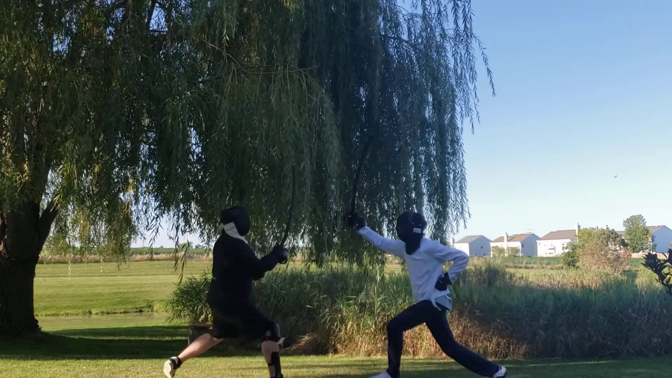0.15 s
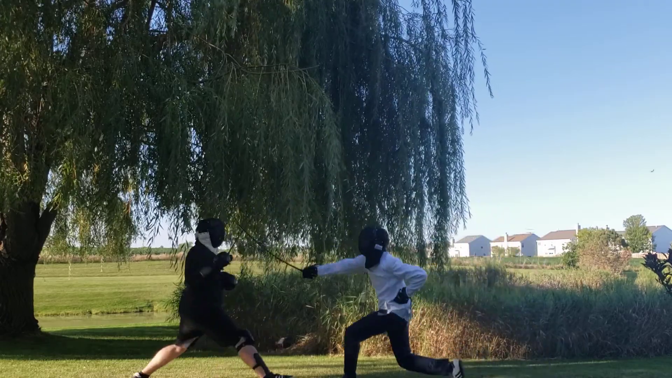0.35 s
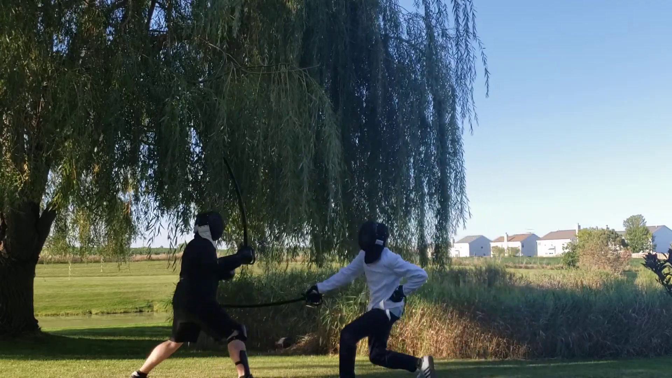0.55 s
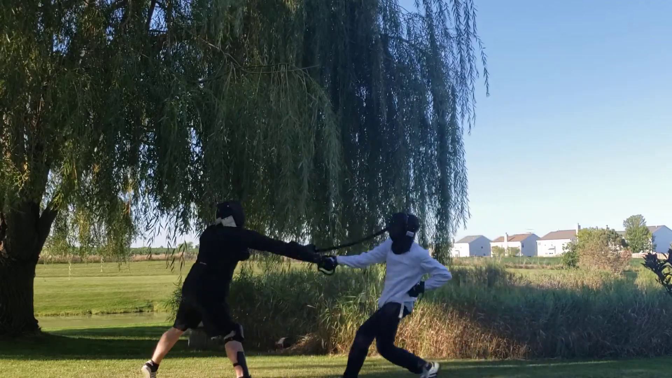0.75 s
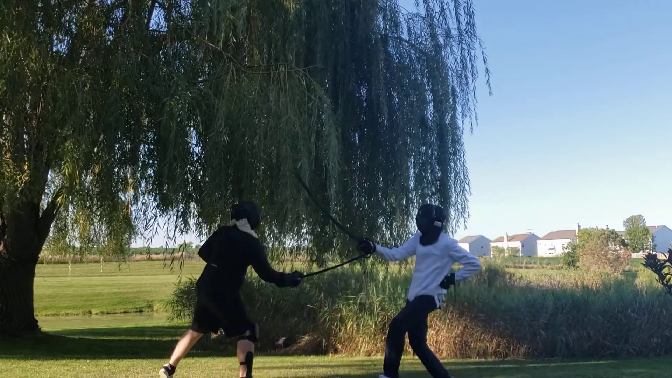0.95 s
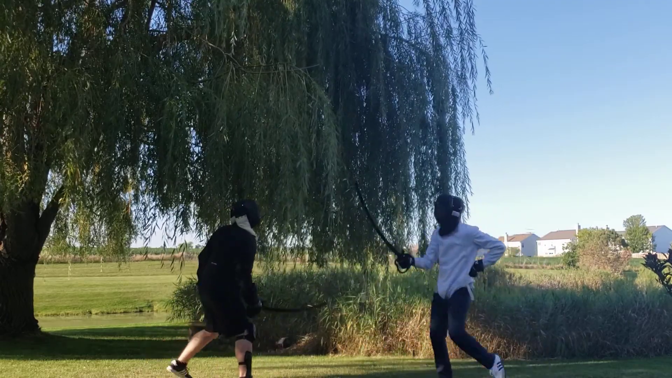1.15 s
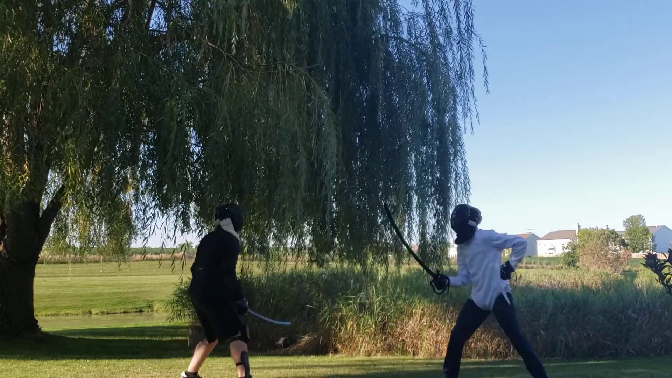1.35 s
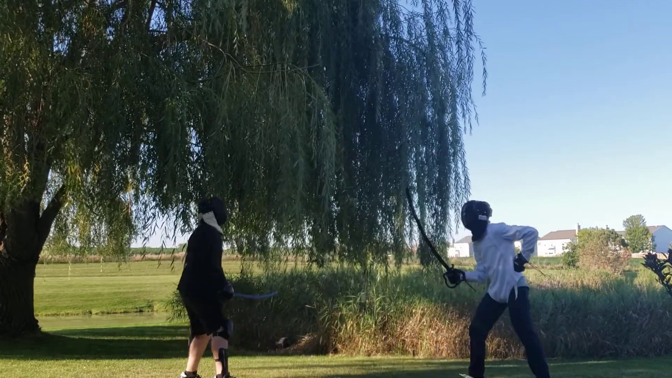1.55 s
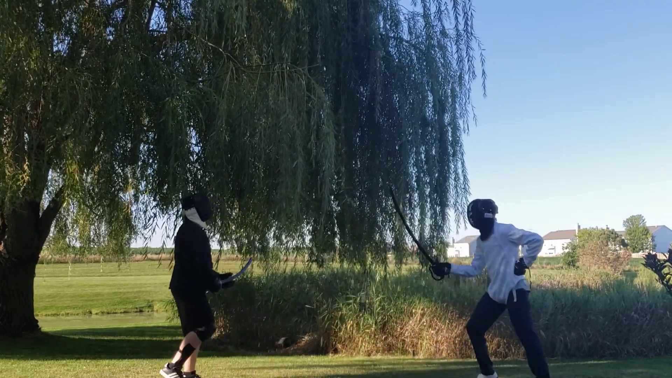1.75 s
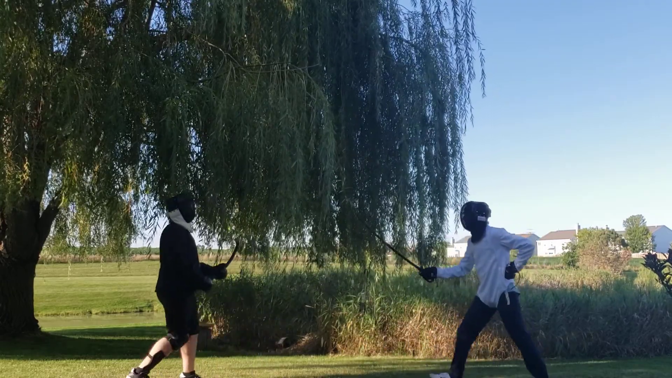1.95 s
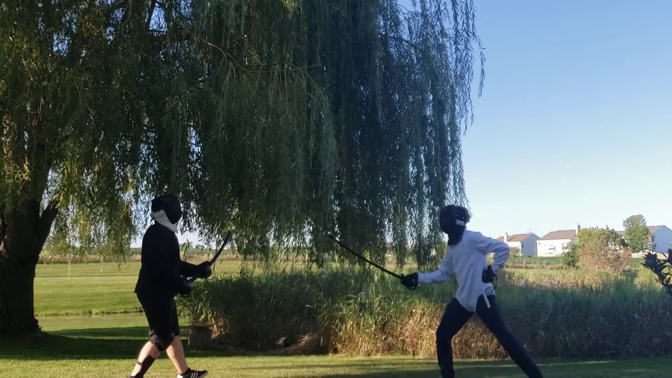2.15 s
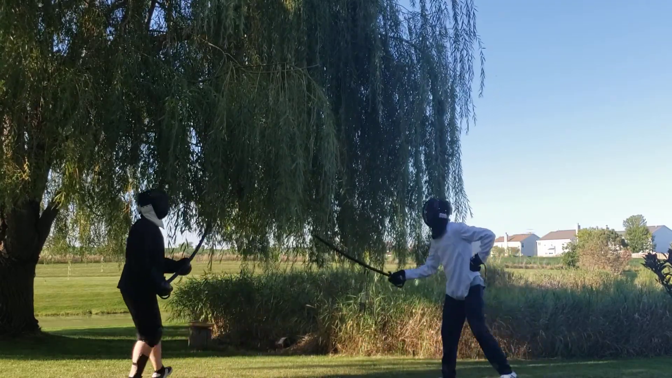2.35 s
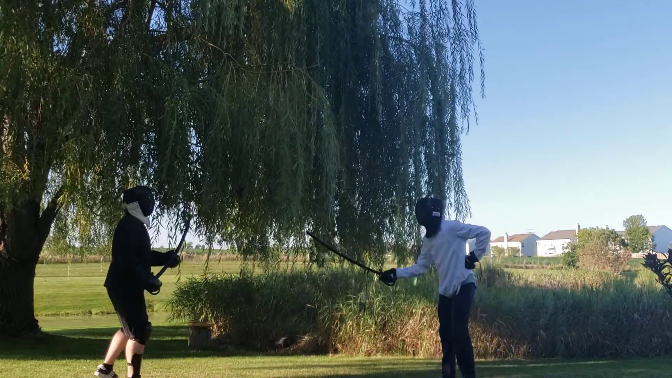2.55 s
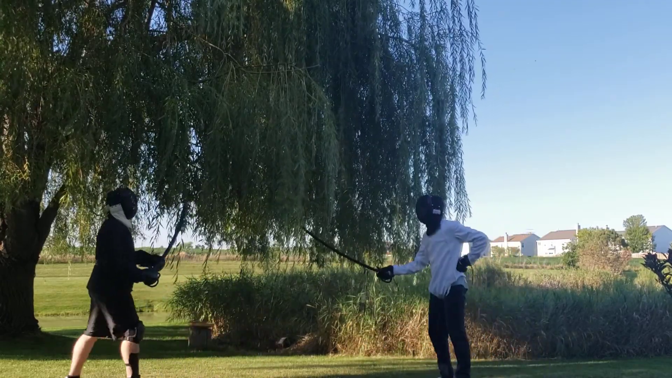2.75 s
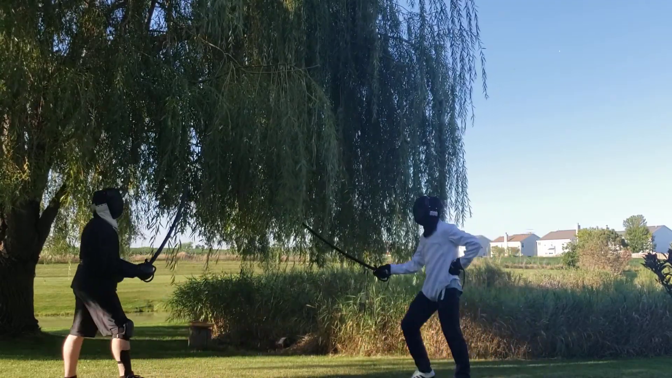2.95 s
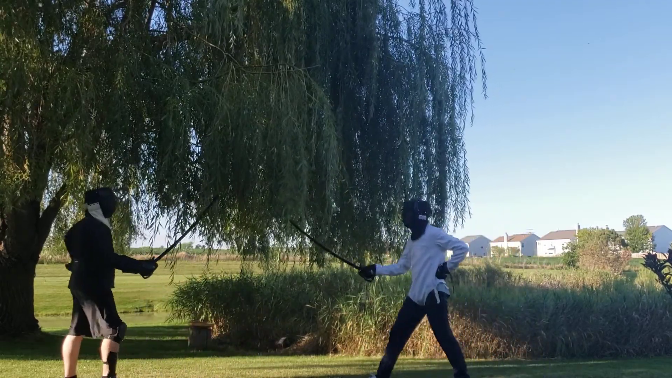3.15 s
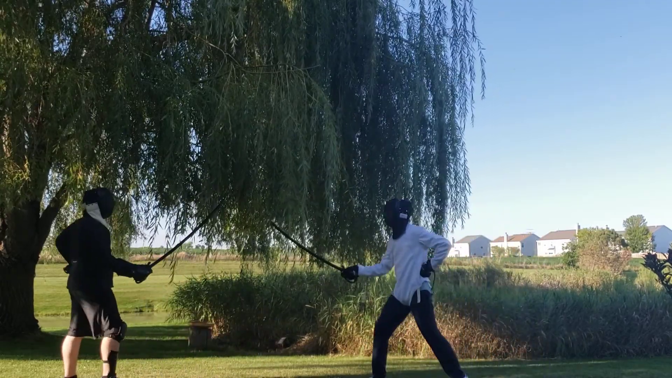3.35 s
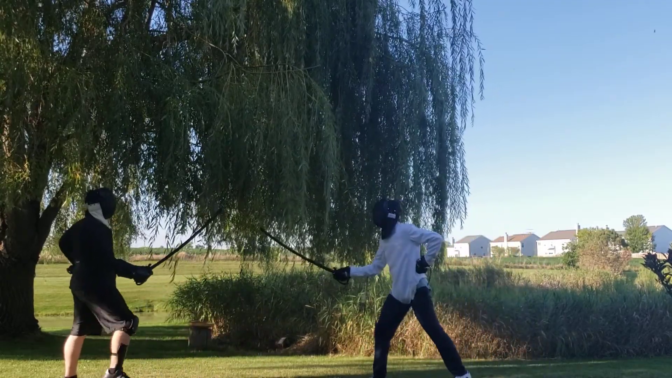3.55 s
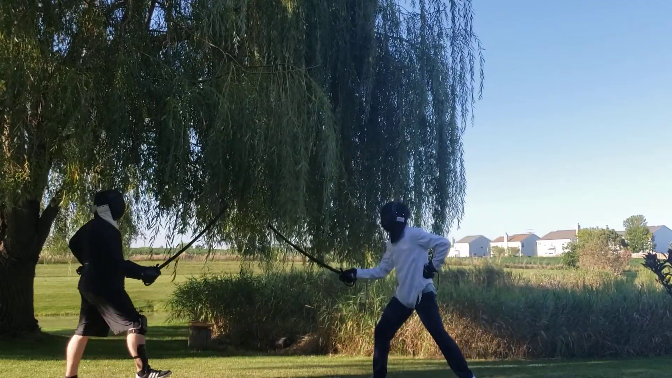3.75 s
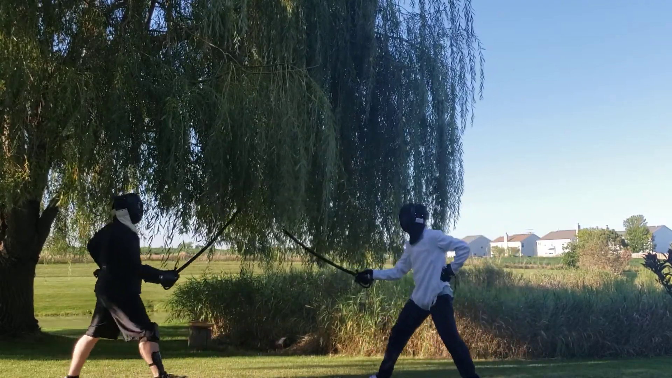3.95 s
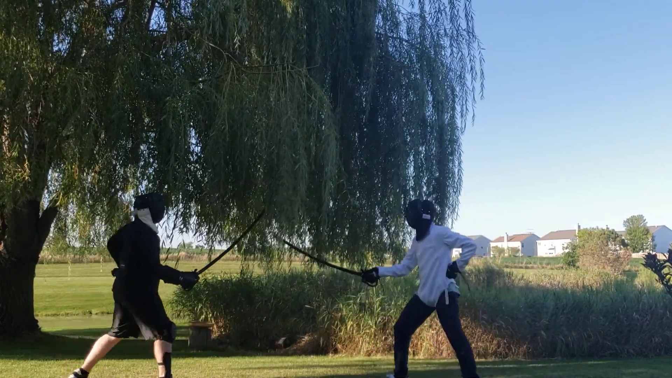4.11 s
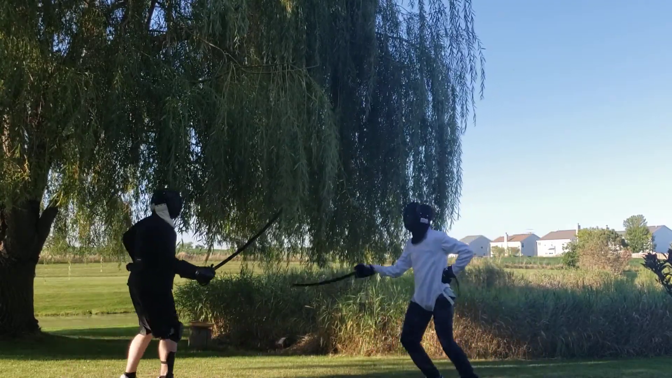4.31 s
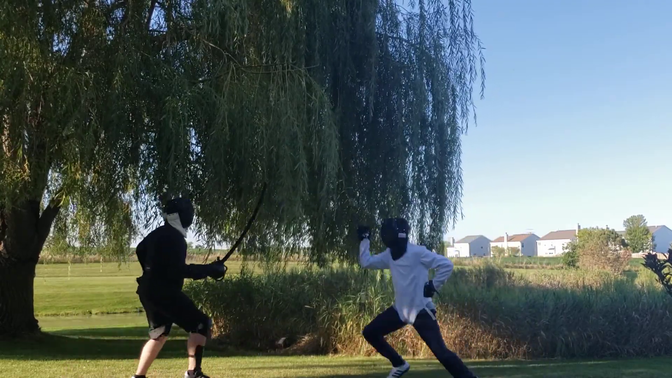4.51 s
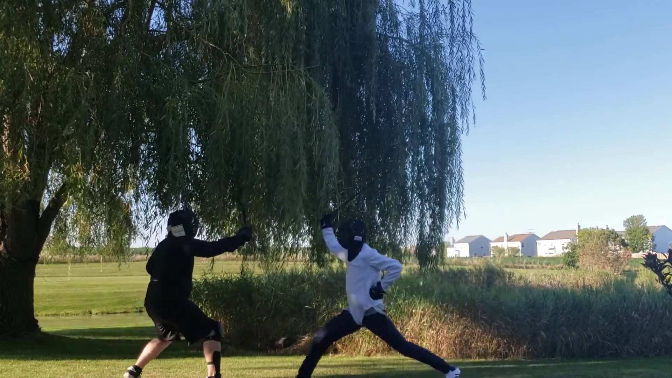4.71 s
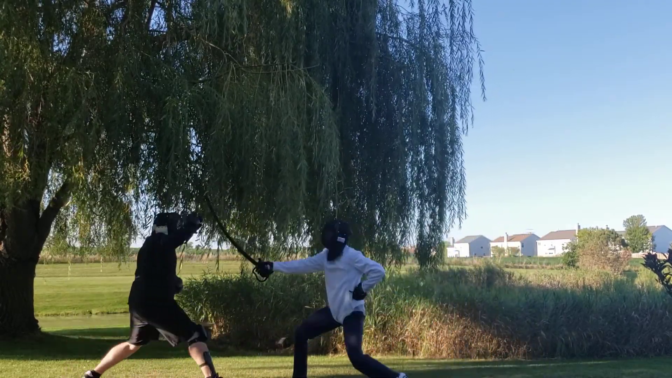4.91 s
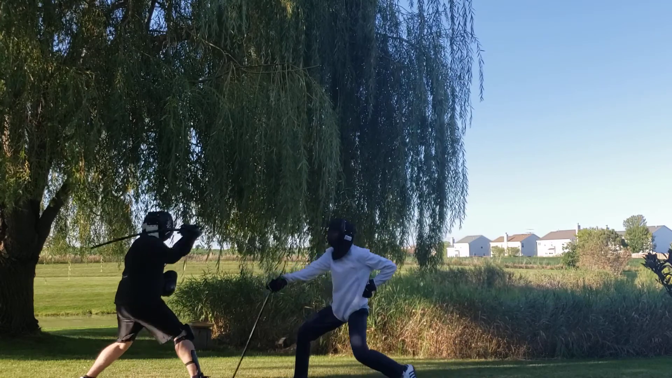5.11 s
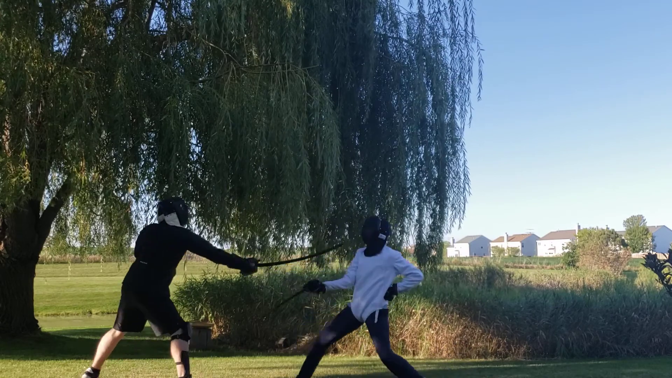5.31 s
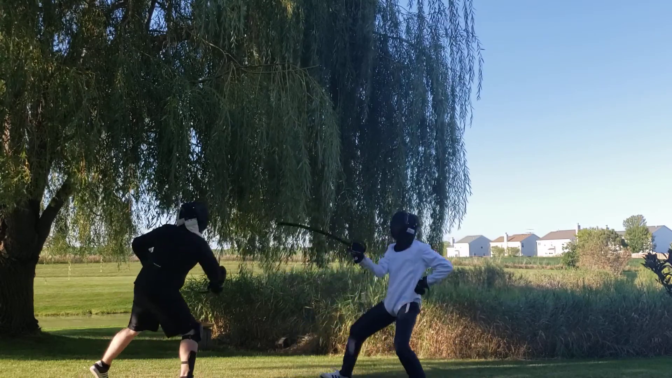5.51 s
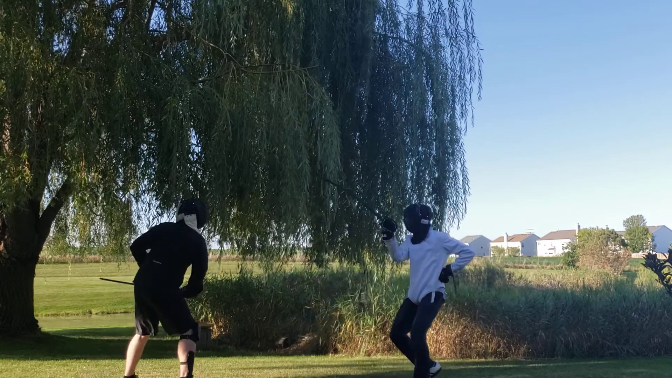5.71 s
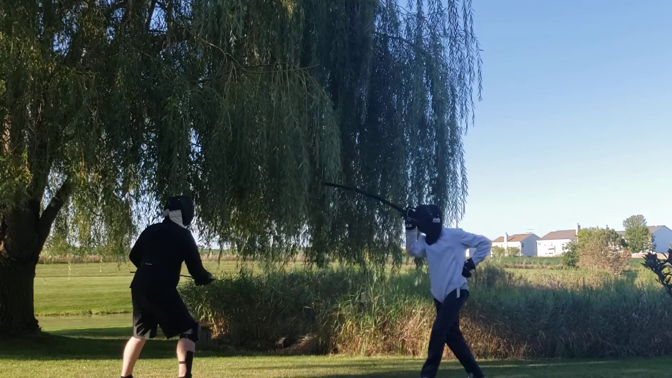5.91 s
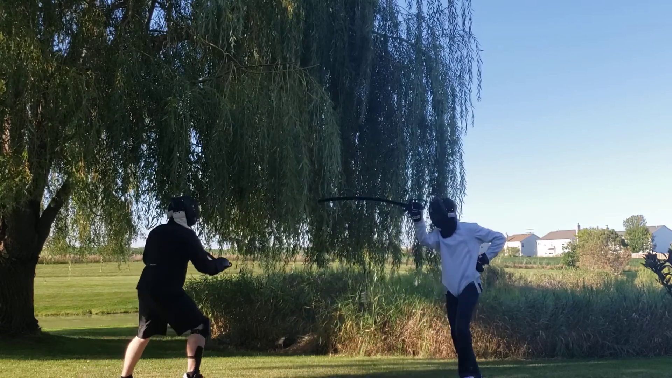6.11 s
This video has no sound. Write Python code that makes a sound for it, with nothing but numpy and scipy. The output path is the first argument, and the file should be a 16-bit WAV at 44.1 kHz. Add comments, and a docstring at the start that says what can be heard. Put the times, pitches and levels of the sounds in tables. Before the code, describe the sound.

Blunt steel sabres clash in sharp, dry clacks with slapping outdoor echoes, a long lull of wind, distant traffic and insects, then another flurry.

```python
"""Blunt sabres clack and chatter as two fencers spar on a lawn beside a willow, metres from a phone.
Each blow is a click that rings damped blade modes; a wall, trees and houses echo it, the willow scatters it.
Grainy ticks follow. Feet stamp as falling tones and brush the grass as noise; blades and sleeves swish.
Wind bumps the right microphone port with low puffs and flutter. Behind: a traffic drone of shaped noise,
rustling air, an insect chorus with buzzes and a pulsed trill, and a few faint gliding bird chirps."""
import sys
import numpy as np
from scipy import signal
from scipy.fft import rfft, irfft, next_fast_len
from scipy.io import wavfile
from scipy.ndimage import uniform_filter1d

SR = 44100
rng = np.random.default_rng(int(sys.argv[2]) if len(sys.argv) > 2 else 0)


def put_to_file(sound):
    """Save the sound as 16-bit audio at rate SR, in the file named by the first command-line argument."""
    columns = np.atleast_2d(sound).T  # one column per channel
    safe = np.clip(columns, -1, 1)
    whole_steps = np.round(safe * 32767)
    wavfile.write(sys.argv[1], SR, whole_steps.astype(np.int16))


def elevation(decibels):
    """Turn decibel levels (scalar or array-like) into linear amplitude ratios."""
    levels = np.asarray(decibels, float)
    return 10 ** (levels / 20)


N = 276371
T = np.arange(N) / SR
PORT_MS = 0.38  # lag of the right port for sound from the far left


def curve(table, column):
    """One column of a table, joined by straight lines in time."""
    return np.interp(T, [row[0] for row in table], [row[column] for row in table])


def colour(x, points, late_ms=0.):
    """Shape a sound by (frequency [Hz], gain [dB]) points and delay it."""
    size = next_fast_len(x.shape[-1] + 4096)
    hz = np.arange(size // 2 + 1) * SR / size + 1e-3
    gain = elevation(np.interp(np.log(hz), np.log([p[0] for p in points]), [p[1] for p in points]))
    delay = np.exp(-2j * np.pi * hz * late_ms / 1000)
    return irfft(rfft(x, size) * gain * delay, size)[..., :x.shape[-1]]


def band(x, hz, width_hz):
    """A resonance with gain 1 at its centre."""
    return signal.lfilter(*signal.iirpeak(hz, hz / width_hz, SR), x)


def band_twice(x, hz, width_hz):
    """Two equal resonances in series: steeper skirts."""
    return band(band(x, hz, width_hz), hz, width_hz)


def noise(points):
    """Coloured noise of rms 1."""
    x = colour(rng.standard_normal(N), points)
    return x / x.std()


def walk(rate_hz):
    """Random levels held 1 / rate_hz and slewed twice; spread near 1."""
    hold = int(SR / rate_hz)
    steps = np.repeat(rng.standard_normal(N // hold + 1), hold)
    return 1.3 * uniform_filter1d(uniform_filter1d(steps, hold), hold)[:N]


def hump(middle_s, length_s):
    """A smooth swell, near 0.1 at both ends of its length."""
    return np.exp(-((T - middle_s) / length_s * 3) ** 2)


def decay(t, t60_s):
    """Exponential fade by 60 dB in t60_s."""
    return np.exp(-np.log(1000) * t / t60_s)


def add(track, s, sound):
    """Mix a short sound in at a time."""
    i = int(s * SR)
    track[i:i + len(sound)] += sound[:N - i]


# left port faces the fencers: (frequency [Hz], left minus right [dB])
PORT_TILT = [(300, -0.5), (1000, 5.5), (3000, 8), (6000, 9), (10000, 3.5), (16000, 15)]


def ports(x, late_ms):
    """A source on both ports: mostly brighter on the left, right delayed by late_ms."""
    left = colour(x, [(hz, db / 2) for hz, db in PORT_TILT])
    right = colour(x, [(hz, -db / 2) for hz, db in PORT_TILT], late_ms)
    return np.array([left, right])


# steel on steel: (frequency [Hz], level [dB])
CRACK_COLOUR = [(300, -15.5), (600, -1.5), (900, 2), (2300, 3), (4000, 0.5), (5800, -5.5), (8000, -3.5),
                (9800, -11.5), (14500, -8.5), (20000, -27.5)]
# thudding guard fades out over: (from [Hz], to [Hz])
GUARD_FADE_HZ = (765, 1910)
# biting edge: (starts [Hz], full from [Hz], full to [Hz], ends [Hz])
EDGE_FADE_HZ = (3370, 5690, 6330, 8740)
# whipping tip fades in over: (from [Hz], to [Hz])
TIP_FADE_HZ = (7800, 9800)


def crack(db, guard_db, edge_db, tip_db):
    """First contact: minimum-phase click with this colour (log gain folded in the cepstrum)."""
    pitch = np.log(np.maximum(np.arange(513) * SR / 1024, 1))
    shape = np.interp(pitch, np.log([p[0] for p in CRACK_COLOUR]), [p[1] for p in CRACK_COLOUR])
    shape += guard_db * np.interp(pitch, np.log(GUARD_FADE_HZ), [1, 0])
    shape += edge_db * np.interp(pitch, np.log(EDGE_FADE_HZ), [0, 1, 1, 0])
    shape += tip_db * np.interp(pitch, np.log(TIP_FADE_HZ), [0, 1])
    cepstrum = irfft(np.log(elevation(db + shape)))
    cepstrum[1:512] *= 2
    cepstrum[513:] = 0
    return irfft(np.exp(rfft(cepstrum)))


# blades and guards damped by gloved hands, nominal: (frequency [Hz], level over the crack [dB], t60 [s])
BLADE_MODES = [(584, 0.6, 0.048), (869, 6, 0.039), (1340, -0.5, 0.021), (1660, -2, 0.0072),
               (2200, -2.5, 0.026), (3062, -4, 0.009), (4060, 3, 0.0069), (4700, -7.5, 0.0045),
               (5800, -0.5, 0.012), (7500, -2.5, 0.042)]
CHATTER_MS = 3.3


def clack(contact, chatter_db):
    """The contact chatters for a few ms and rings damped modes, a little differently each time."""
    t = np.arange(1024) / SR
    push = elevation(chatter_db) * rng.standard_normal(len(t)) * np.exp(-t * 1000 / CHATTER_MS)
    push[int(.0005 * SR)] -= 1
    push /= np.sqrt(np.sum(push ** 2))
    ring = np.zeros(len(t))
    ring[0] = 1
    for (hz, db, t60_s), (detune, share) in zip(BLADE_MODES, rng.standard_normal((len(BLADE_MODES), 2))):
        fade = decay(t, t60_s)
        tone = np.sin(2 * np.pi * hz * (1 + 0.018 * detune) * t)
        ring += elevation(db + 2 * share) * tone * fade * 2 / fade.sum()
    return signal.fftconvolve(signal.fftconvolve(contact, push), ring)


def rough_wall():
    """Ledges and boards split the slap into a short cluster."""
    blur = .08 * rng.standard_normal(256) * np.exp(-np.arange(256) / 60)
    blur[0] = -.9
    return blur


WALL_S = .0517  # usual delay; echoes from beyond the wall shift along with it


def echoes(contacts, delays_s, reflectors):
    """Each rough reflector blurs and colours contacts given as (time s, wall delay shift s, sound)."""
    out, t = np.zeros((2, N)), np.arange(3072) / SR
    for delay_s, (db, hz, width_hz, t60_s, late_ms) in zip(delays_s, reflectors):
        echo = np.zeros(N)
        for s, shift_s, sound in contacts:
            blur = rng.standard_normal(len(t)) * decay(t, t60_s)
            blur[0] += np.sqrt(np.sum(blur ** 2))
            blur /= np.sqrt(np.sum(blur ** 2))
            add(echo, s + delay_s + shift_s * (delay_s > WALL_S), signal.fftconvolve(sound, blur))
        echo = band_twice(echo, hz, width_hz)
        out += elevation(db) * np.array([np.roll(echo, -int(late_ms * SR / 1000)), echo])
    return out


# scatter from turf and trunk over the crown to the reeds: (swells until [s], level [dB], t60 [s])
WILLOW_SWELLS = [(.004, -28.5, 0.087), (0.034, -32, 0.24), (.15, -50.5, .6)]
# (frequency [Hz], level [dB])
WILLOW_TINT = [(300, -2.5), (800, -5), (2000, -4.5), (4300, 1), (6500, -8), (9000, 2), (16000, -1)]
PATCHY_DB, TWIGS_DB = 3.2, 3  # spread per band over 6 ms patches; spread of the quick flicker all bands share


def willow(contacts):
    """Uneven reflectors scatter the blows: patchy noise bands, different leaves for each port."""
    t = np.arange(int(.45 * SR)) / SR
    leaves = 0
    for hz in 400 * 2 ** np.arange(0, 5.6, .5):
        patches = uniform_filter1d(rng.standard_normal((2, len(t))), size=256) * np.sqrt(256)
        grain = band_twice(rng.standard_normal((2, len(t))), hz, hz / 2)
        leaves = leaves + grain * elevation(PATCHY_DB * patches)
    flicker = uniform_filter1d(rng.standard_normal(len(t)), size=64) * 8
    leaves = leaves * elevation(TWIGS_DB * flicker)
    # long paths lose their treble to the air
    dull = colour(leaves, [(800, -0.5), (2500, 6.0), (5000, -4), (9000, -17.5)])
    power = 0
    for peak_s, db, t60_s in WILLOW_SWELLS:
        power = power + elevation(2 * db) * np.where(t < peak_s, (t / peak_s) ** 2, decay(2 * (t - peak_s), t60_s))
    leaves = (dull + (leaves - dull) * np.exp(-t / 0.22)) * np.sqrt(power)
    wash = signal.fftconvolve(colour(contacts, WILLOW_TINT)[None], leaves, axes=1)[:, :N]
    return wash * elevation(np.array([[1.5], [-1.5]]))


# blade contacts: (time [s], level [dB], added by thudding guard [dB], biting edge [dB], whipping tip [dB])
CONTACTS = [(0.3139, 4, -0.5, 13.5, -1.5), (0.3225, -17, -11, 18, 0.5), (0.4581, 3, -10, -5.5, -11.5),
            (0.7727, -2.5, 4, -1, 4), (0.7743, -4.5, 5.5, -4, -0.5), (0.779, -16.5, 10, 5, -1.5),
            (0.784, -13, 13, -4, -1), (0.788, -6.5, 12, 0, -6), (0.793, -8.5, 0, 9, 3.5),
            (1.9534, -52.5, 25, 22, 20), (4.7071, -38.5, 20, 5.5, 12.5), (4.8856, 1.5, -5, 21, 5),
            (4.8967, -4, 6, -7.5, 1.5), (4.9517, -4, -2.5, 2.5, -18.5), (5.4548, -3, 4.5, 4, 8.5),
            (5.459, -22.5, 9, -8, 0.5), (5.476, -27.5, 17, -4.5, 1)]
# how the fencers stand and face in each exchange, sends for clean blows:
# (from [s], wall [dB], willow [dB], trees behind [dB], houses beside [dB])
EXCHANGES = [(0, -31, -0.5, -2, -13), (.4, -5, -8, -0.5, 6), (.7, 0, -4, 6, -20), (4.6, -0.5, -3.5, -4, -3),
             (4.93, -4, -1, 0, -23), (5.3, -22.5, -12, -10.5, -24)]
# wall delay in each exchange: (delay [s])
WALL_DELAYS_S = [.0523, .051, .0543, .0512, .0495, .0528]
# chatter: (clean blows [dB], rebounds [dB])
CHATTER_LEVELS_DB = (-24, -13)
# reflectors: (level [dB], centre [Hz], width of each of two passes [Hz], blur t60 [s], right lag [ms])
TREE_ECHOES = [(-16.5, 2000, 7300, .006, .2), (-16.5, 2400, 3000, 0.063, -.2)]
HOUSE_ECHOES = [(-26.5, 2200, 3000, .012, 0.), (-11.5, 910, 670, .02, 0.)]
# usual delay of each reflector: (delay [s])
TREE_DELAYS_S = (.030, .137)
HOUSE_DELAYS_S = (.110, .1675)
WALL_HZ, WALL_WIDTH_HZ = 4610, 7100  # width of each of two passes
REBOUND_S, BOUNCE_ECHO_DB = .025, -8  # a contact this soon after another is a rebound and echoes less


def sabres():
    """Direct blows, the slap from the wall on the left, other echoes and the willow's wash."""
    direct, to_wall, to_willow = np.zeros((3, N))
    to_trees, to_houses = [], []
    for s, *levels_db in CONTACTS:
        contact = crack(*levels_db)
        rebound = any(0 < s - other[0] < REBOUND_S for other in CONTACTS)
        k = sum(row[0] <= s for row in EXCHANGES) - 1
        wall_s, (_, wall_db, willow_db, trees_db, houses_db) = WALL_DELAYS_S[k], EXCHANGES[k]
        less_db = BOUNCE_ECHO_DB * rebound
        add(direct, s, clack(contact, CHATTER_LEVELS_DB[rebound]))
        slap = signal.fftconvolve(contact, rough_wall())
        add(to_wall, s + wall_s, elevation(wall_db + less_db) * slap)
        add(to_willow, s, elevation(willow_db) * contact)
        to_trees.append((s, wall_s - WALL_S, contact * elevation(trees_db + less_db)))
        to_houses.append((s, wall_s - WALL_S, contact * elevation(houses_db + less_db)))
    out = ports(direct, 0.053) + ports(band_twice(to_wall, WALL_HZ, WALL_WIDTH_HZ), PORT_MS)
    out += echoes(to_trees, TREE_DELAYS_S, TREE_ECHOES) + echoes(to_houses, HOUSE_DELAYS_S, HOUSE_ECHOES)
    return out + willow(to_willow)


# short grainy ticks in the tails of the blows, mostly echoes from trees, wall and houses,
# some perhaps rattles: (time [s], peak before panning [dB], frequency [Hz], t60 [s])
LATE_TICKS = [(0.363, -38, 2300, 0.011), (.385, -35, 1900, .012), (.451, -42, 4100, .015),
              (0.452, -42, 1700, .01), (.478, -42, 2500, .012), (0.598, -46.5, 1487, 0.032),
              (.66, -52, 2280, .015), (0.802, -23, 1250, 0.0083), (.841, -28.5, 2120, 0.017),
              (0.912, -40.5, 2100, 0.16), (.976, -47.5, 1600, 0.044), (4.9145, -18, 4000, .012),
              (4.946, -25, 4000, .01), (5.021, -28, 4160, 0.013), (5.021, -39, 2200, 0.12),
              (5.085, -35, 3900, .025), (5.109, -51, 5200, .012), (5.114, -47.5, 1020, 0.018),
              (5.132, -47, 1120, 0.026), (5.174, -51, 3660, 0.078)]


def late_ticks():
    """Grainy bursts, each through one broad resonance, a little louder on the left."""
    out, t = np.zeros((2, N)), np.arange(6144) / SR
    for s, db, hz, t60_s in LATE_TICKS:
        grains = rng.standard_normal(len(t)) * elevation(4 * np.repeat(rng.standard_normal(96), 64))
        grains[0] = 9  # sharp onset
        burst = band_twice(grains * decay(t, t60_s), hz, 0.45 * hz)
        burst *= elevation(db) / np.abs(burst).max()
        add(out[0], s, elevation(1.5) * burst)
        add(out[1], s, elevation(-2.0) * burst)
    return out


# lunges: (time [s], level [dB], pitch scale [Hz], t60 [s])
LUNGES = [(0.294, -8.5, 234, 0.018), (4.754, -13, 223, 0.027), (4.775, -21.5, 206, 0.039)]


def stamps():
    """Lunges thump the turf: a tone falling from 1.7 to 0.15 times its pitch scale."""
    thumps, t = np.zeros(N), np.arange(4096) / SR
    for s, db, hz, t60_s in LUNGES:
        turns = hz * (0.15 * t + 0.64 * 0.0085 * (1 - np.exp(-t / 0.0035)))
        press = (1 - np.exp(-(t / .0016) ** 2)) * decay(t, t60_s)
        add(thumps, s, elevation(db) * np.cos(2 * np.pi * turns) * press)
    return thumps


# feet brushing the grass: (middle [s], length [s], level [dB])
GRASS_BRUSHES = [(0.463, 0.61, -60), (0.974, 0.51, -61), (1.327, 0.3, -64), (1.633, 0.13, -66),
                 (2.38, .2, -65), (4.26, 0.19, -69), (4.355, 0.23, -65), (4.624, 0.24, -67),
                 (4.775, 0.26, -59.5), (5.559, 0.23, -58.5), (5.922, 0.22, -67.5)]


def grass():
    """Grass hisses under moving feet: treble noise in unsteady swells."""
    tint = [(5000, -19.0), (9500, -19.5), (12500, -10.0), (15200, -8.5), (16500, -9.0)]
    hiss = np.array([noise(tint), noise(tint)])
    return hiss * elevation(1.5 * walk(55)) * sum(elevation(db) * hump(s, length_s) for s, length_s, db in GRASS_BRUSHES)


# blades and sleeves cutting the air: (middle [s], length [s], level [dB], centre [Hz])
AIR_CUTS = [(0.22, 0.3, -65.5, 1650), (4.72, 0.21, -63.5, 1366), (5.432, 0.14, -59, 1900),
            (5.42, 0.12, -66, 2900), (5.935, 0.2, -70.5, 1470)]


def swishes():
    """Broad rushes of air around a centre pitch."""
    out = np.zeros((2, N))
    for s, length_s, db, hz in AIR_CUTS:
        tint = [(hz / 3, -24), (hz * 0.64, -8), (hz, 0), (hz * 1.3, -9), (hz * 2.2, -26)]
        rush = colour(rng.standard_normal((2, N)), tint)
        out += elevation(db) * hump(s, length_s) * elevation(2.5 * walk(90)) * rush / rush.std()
    return out


# (strongest at [s], level [dB], build-up [dB/s], die-away [dB/s])
WIND_GUSTS = [(0., -37, 30, 9.5), (3.902, -42, 22, 45)]
# low puffs, centred 23 ms after their start: (start [s], level [dB])
WIND_PUFFS = [(0.026, -20), (0.104, -19.5), (0.252, -30), (0.737, -27), (0.99, -25), (1.106, -27.5),
              (1.252, -29.5), (3.64, -29), (3.974, -24.5)]


def wind():
    """Eddies knock the right port: single low puffs over an uneven flutter; left 20 dB down."""
    tint = [(20, -24), (40, -4), (70, 0), (120, -8), (250, -26), (600, -50), (3000, -90)]
    knocks = noise(tint) * elevation(3.5 * walk(16))
    gusts = 0
    for s, db, rise, fall in WIND_GUSTS:
        gusts = gusts + elevation(db - np.where(T < s, rise * (s - T), fall * (T - s)))
    knocks *= gusts
    t = np.arange(-1024, 2048) / SR
    for s, db in WIND_PUFFS:
        add(knocks, s, elevation(db) * np.sin(2 * np.pi * 70 * t) * np.exp(-(t / 0.0081) ** 2))
    return np.array([elevation(-20) * knocks, knocks])


# traffic: (time [s], level [dB])
TRAFFIC = [(0.0, -49), (0.84, -45), (1.08, -49.5), (2.15, -49), (3.11, -47.5), (3.35, -49.5), (3.94, -45.5),
           (4.22, -42), (4.57, -46.5), (5.24, -49.5), (5.9, -46), (6.27, -54)]
# (frequency [Hz], level [dB])
TRAFFIC_COLOUR = [(76, -46.5), (130, -7), (208, -1.5), (260, 1), (359, -9.5), (430, -22), (480, -16.5),
                  (625, -25), (1000, -37.5), (1300, -66.5)]
RUMBLE_COLOUR = [(20, -39.5), (32, -13), (48, 14.5), (70, 11.5), (100, 10.5), (135, -3), (200, -53)]
# traffic power on the left: (time [s], share [0-1])
LEFT_SHARE = [(0, 0), (.8, 0.45), (3.2, 0.02), (3.7, 0.54), (6.27, 0.98)]


def road():
    """Distant traffic drones from both sides, over a deeper and looser rumble."""
    share = np.clip(curve(LEFT_SHARE, 1), 0, 1)
    left, right = (noise(TRAFFIC_COLOUR) * elevation(curve(TRAFFIC, 1) + 0.29 * walk(17)) for _ in "lr")
    drone = ports(left * np.sqrt(share), PORT_MS) + ports(right * np.sqrt(1 - share), -PORT_MS)
    rumble = ports(noise(RUMBLE_COLOUR), 0.) * elevation(-48.0)
    rumble += np.array([noise(RUMBLE_COLOUR), noise(RUMBLE_COLOUR)]) * elevation(-60.0)
    diffuse = np.array([noise(TRAFFIC_COLOUR), noise(TRAFFIC_COLOUR)]) * elevation(-57.5)
    return drone + rumble + diffuse


# (frequency [Hz], level [dB])
AIR_COLOUR = [(500, 4.5), (900, -3), (1400, -3), (2000, -9), (4000, -15), (8000, -20), (9500, -25),
              (12000, -13), (15200, -8), (16500, -11)]


def air():
    """Faint rustling air: independent steady noise on each port."""
    return np.array([noise(AIR_COLOUR) * elevation(1.35), noise(AIR_COLOUR) * elevation(-0.5)]) * elevation(-69)


# (frequency [Hz], level [dB])
CHORUS_COLOUR = [(4400, -33), (4800, -6.5), (5400, -0.5), (6000, -5.5), (7000, 1), (8000, -3),
                 (8700, -15.5), (9100, -38)]
# lasting buzzes: (frequency [Hz], width [Hz], level [dB])
BUZZES = [(7000, 180, -73.5), (7700, 110, -78.5)]
# (time [s], level [dB])
TRILL_LEVEL = [(0, -82), (1.8, -79), (2.4, -68.5), (4.2, -69), (5.0, -75), (6.27, -74)]
TRILL_HZ, TRILL_PULSE_HZ = 6330, 37.3
NEAR_MS = -.8  # right port leads for the nearer insects and the birds


def insects():
    """A broad noise chorus, two narrow-band buzzes and a nearer trill of tone pulses."""
    chorus = np.array([noise(CHORUS_COLOUR) * elevation(3.0), noise(CHORUS_COLOUR) * elevation(-3.0)])
    chorus = chorus * elevation(-69 + 0.28 * walk(3))
    near = np.zeros(N)
    for hz, width_hz, db in BUZZES:
        tone = band(rng.standard_normal(N), hz, width_hz)
        near += elevation(db + 2.5 * walk(40)) * tone / tone.std()
    cycle = np.cumsum(TRILL_PULSE_HZ * (1 + .015 * walk(2))) / SR % 1
    pitch_hz = TRILL_HZ * (1.035 - .07 * cycle)  # each pulse slides down a little
    pulses = elevation(curve(TRILL_LEVEL, 1) + walk(30)) * np.sin(np.pi * cycle) ** 4
    near += pulses * np.sin(2 * np.pi * np.cumsum(pitch_hz) / SR)
    return chorus + ports(near, NEAR_MS)


# far birds: (time [s], length [s], from [Hz], to [Hz], level [dB])
BIRD_CALLS = [(1.77, .04, 4100, 4150, -77), (2.01, .035, 4750, 4800, -72), (3.2, .045, 2900, 3800, -76),
              (3.215, .025, 2400, 2550, -77), (3.655, .045, 3400, 4500, -76), (3.39, .07, 8800, 8800, -79),
              (3.675, .045, 3500, 3000, -75), (3.84, .07, 8800, 8800, -76), (4.19, .045, 2900, 4700, -74),
              (4.215, .075, 3450, 3150, -72)]


def birds():
    """Short tones, most of them gliding, hoarse when they fall; foliage smears the far calls."""
    calls, warble = np.zeros(N), 1 + .05 * walk(500)
    for s, length_s, from_hz, to_hz, db in BIRD_CALLS:
        n = int(length_s * SR)
        pitch_hz = np.linspace(from_hz, to_hz, n)
        if to_hz < from_hz:
            pitch_hz = pitch_hz * warble[int(s * SR):][:n]
        add(calls, s, elevation(db) * np.sqrt(np.hanning(n)) * np.sin(2 * np.pi * np.cumsum(pitch_hz) / SR))
    smear = .03 * rng.standard_normal(3000) * np.exp(-np.arange(3000) / 900)
    smear[0] = .9
    return ports(signal.fftconvolve(calls, smear)[:N], NEAR_MS)


def scene():
    """Everything that reaches the two ports."""
    fencers = sabres() + late_ticks() + stamps() + grass() + swishes()
    return fencers + wind() + road() + air() + insects() + birds()


def roll_off(x):
    """The treble ends steeply here."""
    return signal.sosfilt(signal.butter(12, 17050, fs=SR, output="sos"), x)


def record(dry):
    """The phone rounds the loudest peaks and cuts the top above 15.9 kHz."""
    rounded = np.tanh(dry)
    low_pass = signal.ellip(8, .2, 50, 15900, fs=SR, output="sos")
    mix = signal.sosfilt(low_pass, rounded)
    return roll_off(mix)


dry = scene()
out = record(dry)
put_to_file(out)
```